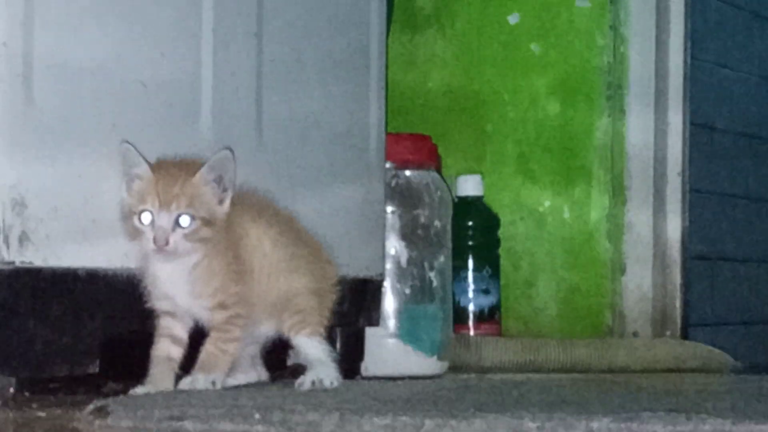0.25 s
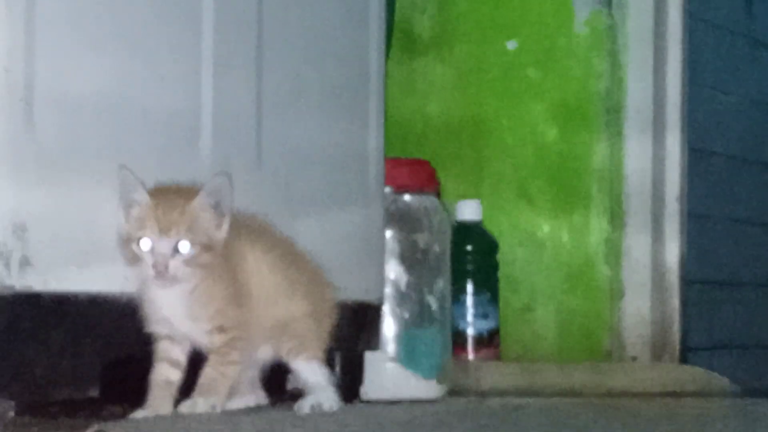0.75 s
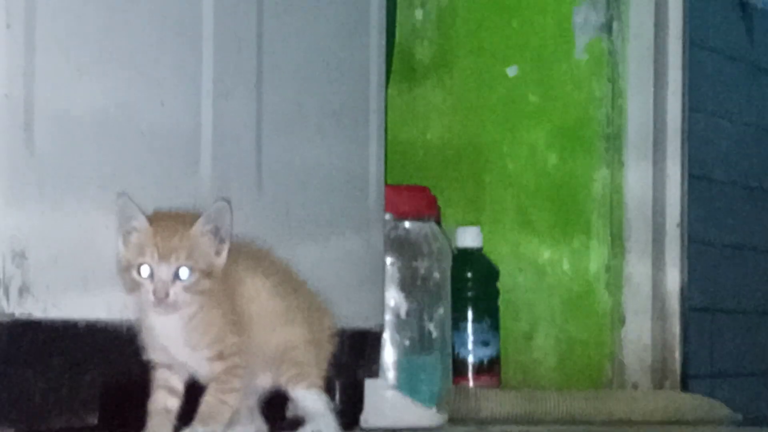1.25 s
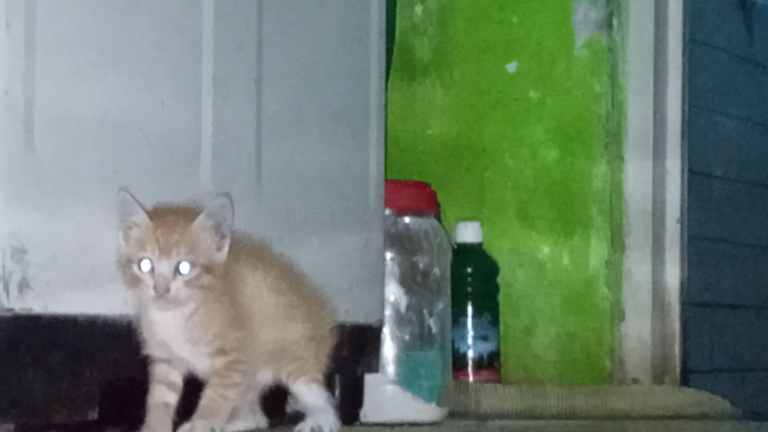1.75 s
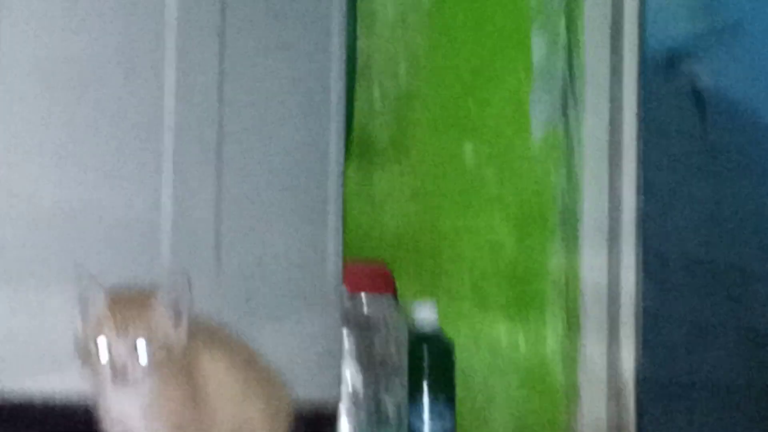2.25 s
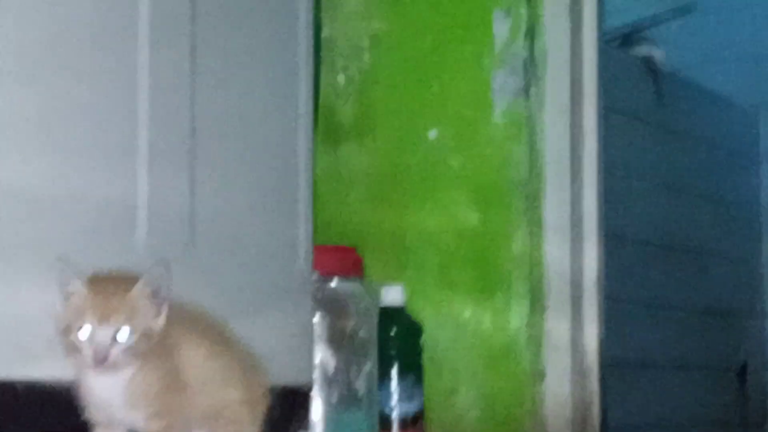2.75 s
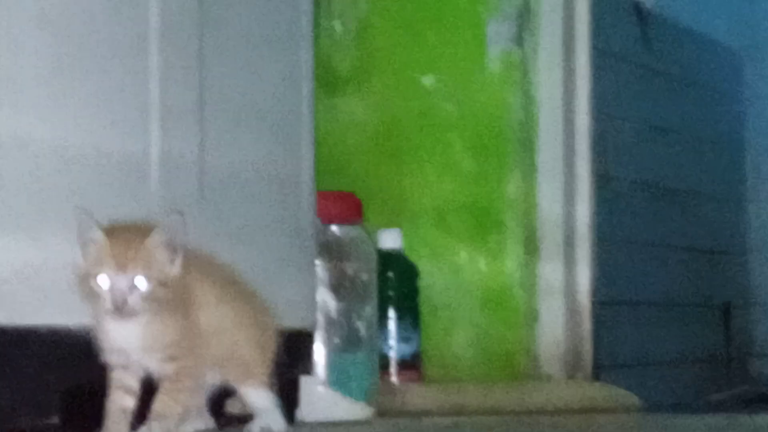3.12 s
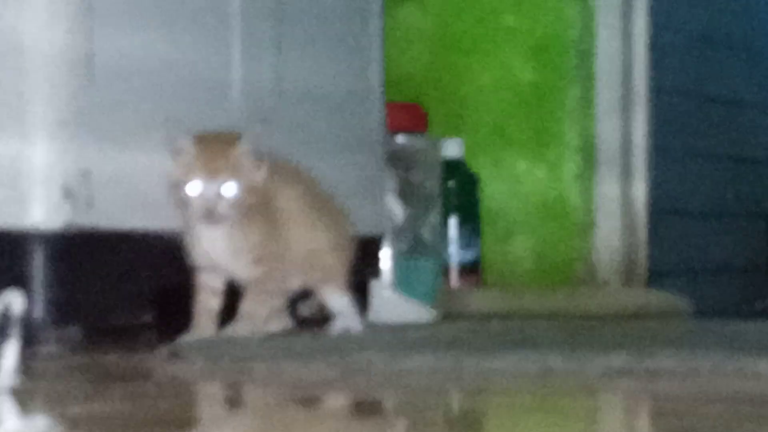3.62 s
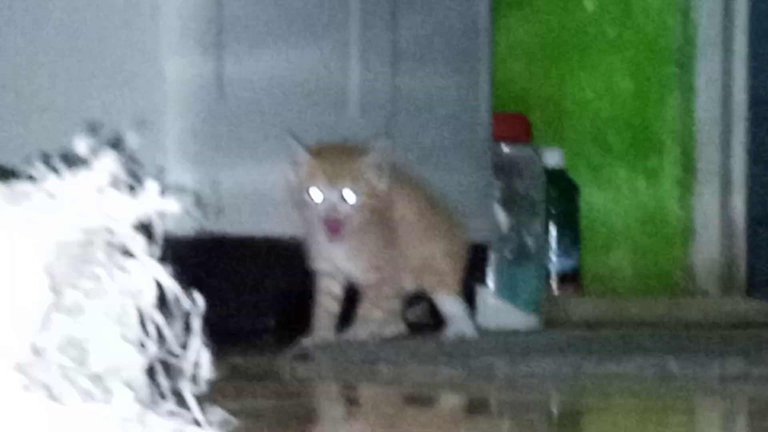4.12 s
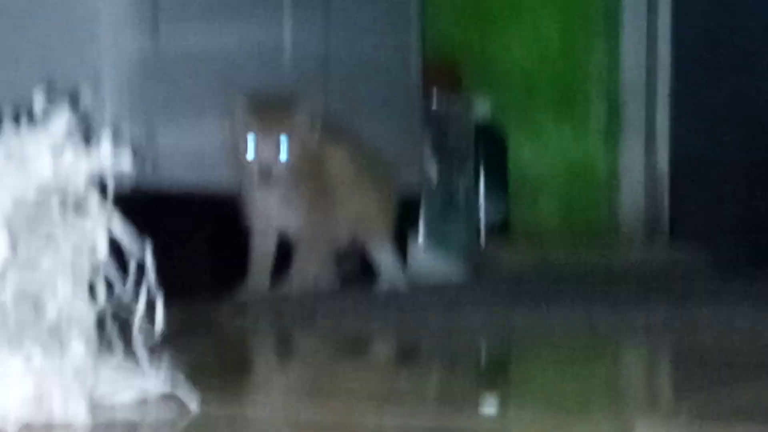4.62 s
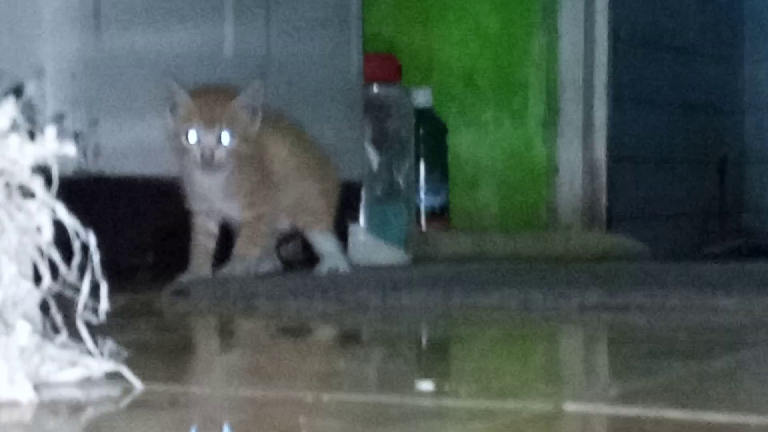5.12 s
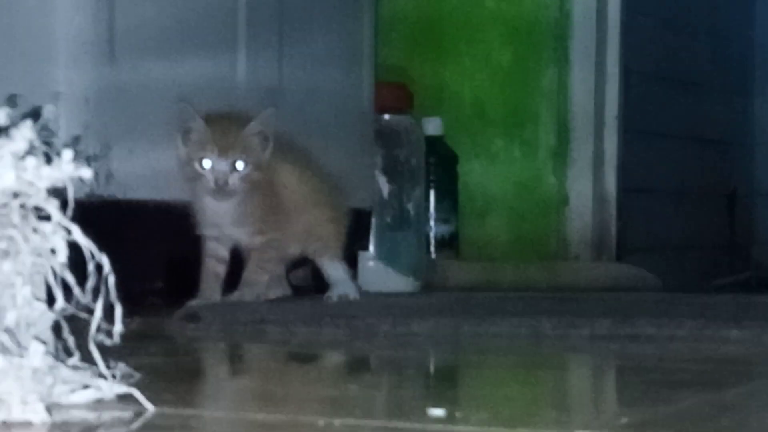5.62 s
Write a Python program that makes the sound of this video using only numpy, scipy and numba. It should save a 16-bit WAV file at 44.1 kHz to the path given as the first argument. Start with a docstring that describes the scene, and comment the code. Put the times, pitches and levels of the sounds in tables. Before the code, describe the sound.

Crickets chirr steadily in still night air. Fingers tap softly on the phone, then a frightened kitten gives a low, rough, muffled growl lasting nearly two seconds. A gritty rub of skin builds close to the microphone, mixed with knocks and bumps. Near the end the kitten growls again, a little louder, under several sharp ticks, and the crickets turn slightly duller.

```python
"""Crickets chirr in the still night air, and a hand taps and shifts on the phone it holds: soft knocks,
a long gritty rub of skin sticking and slipping on the case, and sharp ticks that ring the microphone port.
Over this a frightened kitten in a doorway growls twice, low and rough. Its slack vocal folds flap
unevenly, and its nearly closed mouth lets out only the low tones of its throat."""
import sys
import numpy as np
from scipy import signal
from scipy.fft import rfft, irfft
from scipy.io import wavfile
from scipy.ndimage import uniform_filter1d
from numba import njit

SR = 44100
rng = np.random.default_rng(int(sys.argv[2]) if len(sys.argv) > 2 else 0)


def materialize(psi):
    """Save the field psi as 16-bit PCM at rate SR to the path in sys.argv[1].

    A 1-D psi becomes a single channel; in a 2-D psi each row is a channel.
    """
    bounded = np.clip(np.atleast_2d(psi).T, -1, 1)
    quanta = np.round(bounded * 32767).astype(np.int16)
    wavfile.write(sys.argv[1], SR, quanta)


N = 258857
TIME = np.arange(N) / SR
BIN_HZ = np.arange(N // 2 + 1) * SR / N


def undb(db):
    """Turn decibels into a factor to multiply by."""
    return 10 ** (np.asarray(db) / 20)


def unit(x):
    """Scale a sound to a standard strength (rms 1)."""
    return x / np.std(x)


def curve(rows):
    """Join each column of a table by straight lines in time."""
    times, *columns = np.transpose(rows)
    return [np.interp(TIME, times, column) for column in columns]


def during(rows, fade_s=0.0073):
    """1 within a table's time span, fading to 0 at its ends."""
    return np.clip(np.minimum(TIME - rows[0][0], rows[-1][0] + fade_s - TIME) / fade_s, 0, 1)


@njit
def resonate(x, hz, width):
    """A resonance: let through the sound near a frequency that may move."""
    y, band_state, low_state = np.empty(len(x)), 0., 0.
    for i in range(len(x)):
        tuning, damping = np.tan(np.pi * hz[i] / SR), width / hz[i]
        band = (band_state + tuning * (x[i] - low_state)) / (1 + tuning * (tuning + damping))
        band_state = 2 * band - band_state
        low_state += 2 * tuning * band
        y[i] = damping * band
    return y


def colour(x, outline):
    """Shape a sound's lows and highs by a (frequency, level) outline; rms 1."""
    hz, db = np.transpose(outline)
    gain = undb(np.interp(np.log(np.maximum(BIN_HZ, 1)), np.log(hz), db))
    return unit(irfft(rfft(x) * gain, N))


def wander(rate):
    """A random drift, about 1 in size, that turns `rate` times a second."""
    hold = int(SR / rate)
    steps = np.repeat(rng.standard_normal(N // hold + 1), hold)[:N]
    return unit(uniform_filter1d(steps, hold))


def throb(hz):
    """A repeating swing between -1 and 1 whose pace wanders."""
    return np.sin(2 * np.pi * np.cumsum(hz * (1 + wander(hz / 2) / 5)) / SR)


def ring(hz, cycles, samples=6000):
    """A struck tone that swells and dies within a few cycles; peak 1."""
    turns = np.arange(samples) / SR * hz
    start_phase = 2 * np.arctan(1 / (2 * np.pi * cycles))
    y = turns * np.exp(-turns / cycles) * np.sin(2 * np.pi * turns + start_phase)
    return y / np.abs(y).max()


def slips(per_s, spread_db, smooth):
    """Skin sticks and lets go: tiny clicks of uneven size over a smooth sliding noise."""
    size = undb(spread_db * np.minimum(rng.exponential(size=N), 5))
    clicks = (rng.random(N) < per_s / SR) * size * rng.choice([-1, 1], N)
    return unit(clicks) + smooth * rng.standard_normal(N)


def add(out, start_s, sound):
    """Mix a short sound in at the given time."""
    i = int(start_s * SR)
    out[i:i + len(sound)] += sound[:max(N - i, 0)]


# tone of the still air: (frequency [Hz], relative level [dB])
AIR_COLOUR = [(20, 2), (45, -7.5), (70, 6), (130, -3.5), (250, -9.5), (550, -8.5), (1000, -16.5),
              (2000, -21.5), (7500, -29.5), (12500, -37), (15000, -32), (17000, -16)]

def night_air(level_db=-73.5):
    """Still air makes a faint, deep hush."""
    return colour(rng.standard_normal(N), AIR_COLOUR) * undb(level_db + 0.4 * wander(4.6))


# how strongly the hand trembles: (time [s], level [dB])
TREMOR_LEVELS = [(.85, -81), (1.05, -63.5), (1.6, -65), (1.9, -70.5), (3.4, -77.5), (4.7, -70), (4.95, -52),
                 (5.4, -59), (5.65, -72)]

def hand_tremor():
    """The trembling hand makes a low, unsteady rumble in the case."""
    outline = [(25, -15), (65, 2.5), (150, 10), (230, -2), (400, -20), (1500, -46)]
    rumble = colour(rng.standard_normal(N), outline)
    return rumble * undb(2.5 * wander(18)) * undb(curve(TREMOR_LEVELS)[0])


# one row for each kind of cricket:
# (pitch [Hz], band width [Hz], level [dB], wing strokes [per s], depth of the slow swell [dB])
CRICKET_CHORUSES = [(2338, 218, -60, 96, -2), (3008, 440, -70, 70, 1.5), (3267, 310, -68.5, 44, 0.2),
                    (4777, 450, -74, 54, 4), (6610, 840, -75.5, 41, 0.5), (8720, 660, -67.5, 110, .4),
                    (9440, 950, -71, 63, -0.7)]

def crickets(swell_hz=3.7, cover_at_s=5.04, cover_takes_s=0.5, dull_above_hz=4300, db_per_octave=-10):
    """Many far crickets blur into bands of noise that pulse with their wing strokes and slowly swell."""
    out = 0
    # a finger comes to rest over the microphone port and dulls the highest crickets
    covered = np.clip((TIME - cover_at_s) / cover_takes_s, 0, 1)
    for hz, width, db, stroke_hz, swell_db in CRICKET_CHORUSES:
        dulled_db = db_per_octave * covered * max(np.log2(hz / dull_above_hz), 0)
        wing_band = 1 / (1 + np.abs((BIN_HZ - hz) / (0.7 * width)) ** 3.8)
        chorus = irfft(rfft(rng.standard_normal(N)) * wing_band, N)
        strokes = 1 + 0.3 * throb(stroke_hz)
        swell = undb(swell_db * throb(swell_hz))
        out += undb(db + dulled_db) * unit(chorus * strokes * swell)
    return out


# tone of a fingertip on the case, also heard in rubs and knocks: (frequency [Hz], relative level [dB])
SKIN_COLOUR = [(45, -37), (250, 0.5), (1300, -4), (2200, -7.5), (7000, -15.5), (15000, -42)]
# short drags of a fingertip: (start [s], length [s], level [dB])
FINGER_SCUFFS = [(0.069, 0.079, -69.5), (1.069, 0.092, -63), (1.22, 0.067, -71.5), (1.422, 0.068, -65.5),
                 (2.483, 0.014, -57.5), (2.714, 0.12, -56.5), (2.872, 0.038, -51), (3.038, 0.028, -54.5),
                 (3.565, 0.026, -52), (3.647, 0.076, -45), (3.812, 0.025, -45), (3.919, .05, -46.5),
                 (4.859, 0.019, -44.5), (5.06, 0.048, -38)]

def scuffs(case_hz=1250.0, case_width_hz=1100.0):
    """A fingertip drags briefly: a swell of coarse slips that rings the case."""
    skin = colour(slips(per_s=700, spread_db=2.4, smooth=0.63), SKIN_COLOUR)
    case = unit(resonate(skin, np.full(N, case_hz), case_width_hz))
    swells = sum(undb(db) * np.sin(np.pi * np.clip((TIME - start) / length, 0, 1))
                 for start, length, db in FINGER_SCUFFS)
    return case * swells


# tones of the three parts of a rub, each: (frequency [Hz], relative level [dB])
HISS_COLOUR = [(1200, 0), (2200, 5), (3500, -3), (5000, 1), (6600, 9), (7800, 0), (9500, -33), (11500, -17),
               (15000, -10)]
SIZZLE_COLOUR = [(7000, -22.5), (9000, 0), (12000, -12), (13800, -10.5), (14900, 7), (15800, -6),
                 (17000, -30.5)]
GRIT_COLOUR = [(40, -48), (110, 0.5), (350, -8), (850, -1.5), (1500, -2.5), (2500, -10.5), (4200, 3),
               (9000, -32)]

def sliding_skin(snap_db=-5):
    """Fine slips make hiss and a high sizzle; coarse slips and skin snapping free make grit."""
    fine = slips(per_s=5000, spread_db=5, smooth=1) * undb(2 * wander(70))
    coarse = slips(per_s=1100, spread_db=2.3, smooth=0.4) * undb(4 * wander(60))
    snaps = slips(per_s=35, spread_db=2.1, smooth=0)
    grit = colour(coarse, GRIT_COLOUR) + undb(snap_db) * colour(snaps, SKIN_COLOUR)
    return colour(fine, HISS_COLOUR), colour(fine, SIZZLE_COLOUR), grit


# two long finger slides, the second pressing over the port: (time [s], base level [dB], pressure [0-1])
FINGER_SLIDES = [
    [(2.25, -80, .6), (2.69, -73.5, 0.33), (2.74, -65, 0.32), (3.02, -65, 0.29), (3.09, -67, 0.3),
     (3.45, -66, .3), (3.66, -54, 0.25), (4.05, -59.5, 0.26), (4.42, -54, 0.34), (4.63, -51.5, 0.49),
     (4.7, -59, 0.42)],
    [(4.7, -68, 0.74), (4.76, -57, 0.42), (4.85, -57, 0.44), (4.92, -49, 0.57), (5.01, -48, 0.68),
     (5.09, -48.5, .62), (5.168, -48.5, 0.8), (5.19, -69, 1), (5.62, -73.5, 1), (5.71, -70, 0.99),
     (5.87, -59, 0.99)],
]
# quick finger wipes: (start [s], length [s], base level [dB], pressure [0-1])
FINGER_WIPES = [(0.933, .07, -75, 0), (2.146, 0.0065, -50, 0.2), (5.275, .072, -42.5, 0.49),
                (5.664, 0.025, -71, 0.24)]

def rubbing(hiss_db=6, wipe_attack_s=0.0055, wipe_release_s=0.0051, wipe_fade_db_per_s=-39):
    """Skin drags over the case beside the microphone port, in gritty slides and smoother wipes."""
    hiss, sizzle, grit = sliding_skin()

    def rub(db, pressure, grit_db):
        """A louder rub is grittier, and pressing harder smothers the sizzle."""
        grit_gain = undb(grit_db + 0.12 * (db + 58))
        sizzle_gain = undb(10 - 75.5 * pressure ** 2)
        return undb(db) * (undb(hiss_db) * hiss + grit_gain * grit + sizzle_gain * sizzle)

    out = sum(during(slide) * rub(*curve(slide), grit_db=1) for slide in FINGER_SLIDES)
    for start, length, db, pressure in FINGER_WIPES:
        age = np.maximum(TIME - start, 0)
        attack = np.minimum(age / wipe_attack_s, 1)
        release = np.exp(-np.maximum(age - length, 0) / wipe_release_s)
        out += attack * release * rub(db + wipe_fade_db_per_s * age, pressure, grit_db=-6)
    return out


# shifts of the grip: (time [s], peak level [dB], pitch [Hz])
GRIP_BUMPS = [(0.977, -35.5, 424), (2.148, -45, 85), (3.071, -55.5, 85.06), (5.085, -46, 150),
              (5.167, -36.5, 100.8), (5.277, -30, 182), (5.315, -40, 183), (5.357, -43, 150),
              (5.479, -40.5, 126)]

def bumps():
    """The shifting grip shakes the whole phone with hollow bumps."""
    out = np.zeros(N)
    for start, db, hz in GRIP_BUMPS:
        add(out, start, undb(db) * ring(hz, cycles=0.53))
    return out


# a finger knocking on the case: (time [s], peak level of the push [dB], pitch [Hz])
FINGER_KNOCKS = [(0.7648, -32, 684), (0.794, -36.5, 600), (1.0824, -27, 776), (1.417, -41, 420),
                 (1.574, -36, 435), (2.151, -26.5, 815), (2.893, -42.5, 1104), (2.943, -34, 1271),
                 (3.515, -38, 900), (3.696, -29, 900), (3.74, -30.5, 2000), (3.8166, -26.5, 1180),
                 (3.9131, -25, 1170), (4.217, -33, 970), (4.787, -34, 780), (4.829, -39, 406),
                 (4.864, -29, 900), (4.975, -34, 600), (4.9947, -22, 1090), (5.07, -27, 1616),
                 (5.0976, -20, 1820), (5.278, -27.5, 440), (5.392, -40.5, 405), (5.476, -42.5, 897),
                 (5.555, -34.5, 1090)]

def knocks(thump_hz=140, scuff_decay_s=0.013, lead_s=0.0034):
    """A soft fingertip pushes and bounces back, thumps the case and scuffs as it leaves."""
    out = np.zeros(N)
    skin = colour(rng.standard_normal(N), SKIN_COLOUR)
    t = TIME[:SR // 5]
    for start, db, hz in FINGER_KNOCKS:
        angle = 2 * np.pi * hz * (t - lead_s)
        push = angle * np.exp((1 - angle ** 2) / 2)
        scuff = np.roll(skin, -int(start * SR))[:len(t)] * np.exp(-t / scuff_decay_s)
        octaves = np.log2(hz / 1000)  # softer, lower knocks thump more and scuff less
        add(out, start - lead_s, undb(db) * push)
        add(out, start, undb(db - 25 - 14 * octaves) * ring(thump_hz, cycles=0.25))
        add(out, start, undb(db - 19 + 1.5 * octaves) * scuff)
    return out


# ticks at the port: (time [s], main ring's peak [dB], main ring's pitch [Hz],
# low crack [dB above the main ring], top ring [dB above the main ring])
PORT_TICKS = [(2.153, -33, 6720, 3, 2), (2.744, -25, 8650, -4, 14), (2.941, -36.5, 6040, 3.5, -20),
              (3.393, -31.5, 6200, -22, -2), (5.097, -20, 4153, -3, -5), (5.112, -28, 4370, -12, -1),
              (5.269, -37, 6510, 6, -8), (5.28, -14.5, 6340, -34, 4), (5.586, -7, 6640, -10, -4),
              (5.6042, -15, 6850, 4, 8)]

def ticks(crack_hz=2920, top_hz=17000):
    """Sharp ticks ring the port, the tiny hole in front of the microphone."""
    out = np.zeros(N)
    for start, db, hz, crack_db, top_db in PORT_TICKS:
        crack = undb(crack_db) * ring(crack_hz, cycles=0.14)
        top = undb(top_db) * ring(top_hz, cycles=4.8)
        add(out, start, undb(db) * (ring(hz, cycles=0.95) + crack + top))
    return out


def vocal_folds(tension, age, rest_hz=108.9, rasp=0.44, roughen_s=0.15):
    """The kitten's slack folds flap unevenly, faster in a tenser throat; air rasps once a flap."""
    rough = 0.96 - 0.81 * np.exp(-age / roughen_s)  # starts almost clean and soon breaks up
    jitter = np.exp(rough * (0.2 * wander(130) + 0.04 * wander(22)))
    flap_count = np.cumsum(rest_hz * tension ** 1.2 * jitter) / SR
    flaps = np.diff(np.floor(flap_count), prepend=0) * undb(3.5 * rough * wander(110))
    breath = unit(np.exp(-(flap_count % 1) / 0.36) * rng.standard_normal(N))
    return unit(flaps) + rasp * rough * breath


# resonances of the resting throat: (frequency [Hz], width [Hz], gain [dB], change with open mouth [dB])
THROAT_RESONANCES = [(194, 40, 3.5, -13.5), (346.6, 29.6, -6, 5.5), (436, 85, 3, -5), (583, 93, -4, -2.5),
                     (671, 135, -8.5, 1)]

def throat(buzz, tension, age, quiver=0.042, opening_s=1.43, muffle_hz=790):
    """The quivering throat moves all its resonances together; the nearly closed mouth cuts the highs."""
    mouth = np.minimum(0.11 + (age / opening_s) ** 2, 1)  # opens ever faster as a growl goes on
    stretch = tension * np.exp(quiver * wander(16))
    voice = 0
    for hz, width, rest_db, open_db in THROAT_RESONANCES:
        once = resonate(buzz, hz * stretch, float(width))
        twice = resonate(once, hz * stretch, float(width))
        voice += undb(rest_db + open_db * mouth) * twice
    return unit(signal.sosfilt(signal.butter(8, muffle_hz, fs=SR, output="sos"), voice))


# the two growls, each: (time [s], level before the boost [dB], throat resonance [Hz])
KITTEN_GROWLS = [
    [(1.65, -59.5, 442.4), (1.8, -64.5, 431.4), (2.15, -61.5, 432.5), (2.4, -57.5, 424), (2.62, -57, 436),
     (2.88, -54.5, 450.6), (3.19, -53.5, 457.3), (3.36, -71.5, 474)],
    [(5.1, -56.5, 449.3), (5.22, -51.5, 470.3), (5.47, -52.5, 473.4), (5.63, -62, 424.6),
     (5.71, -56, 433.4), (5.87, -53.5, 455)],
]

def kitten(rest_throat_hz=445, boost_db=2, stutter_hz=19.6, stutter_db=-11.5, stutter_s=0.13):
    """The folds buzz through the throat; each growl catches in a few pulses before it holds."""
    gain, tension, age = 0, 1, 0  # tension is 1 at rest; age is seconds since the growl began
    for growl in KITTEN_GROWLS:
        db, throat_hz = curve(growl)
        since = TIME - growl[0][0]
        gain += undb(db) * during(growl, fade_s=0.0083)
        tension = np.where(since >= 0, throat_hz / rest_throat_hz, tension)
        age = np.where(since >= 0, since, age)
    voice = throat(vocal_folds(tension, age), tension, age)
    dips_db = stutter_db * np.exp(-age / stutter_s) * np.cos(np.pi * stutter_hz * age) ** 2
    return voice * gain * undb(boost_db + dips_db)


def scene():
    """All the sounds meet at one microphone."""
    mix = kitten() + crickets() + rubbing() + scuffs() + knocks() + bumps() + ticks()
    return (mix + night_air() + hand_tremor())[None]


def record(dry, bass_hz=42, top_hz=15900):
    """The phone cuts the deepest bass and the very top."""
    thinned = signal.sosfilt(signal.butter(3, bass_hz, "highpass", fs=SR, output="sos"), dry)
    return signal.sosfilt(signal.ellip(10, 0.2, 80, top_hz, fs=SR, output="sos"), thinned)


dry = scene()
out = record(dry)
materialize(out)
```